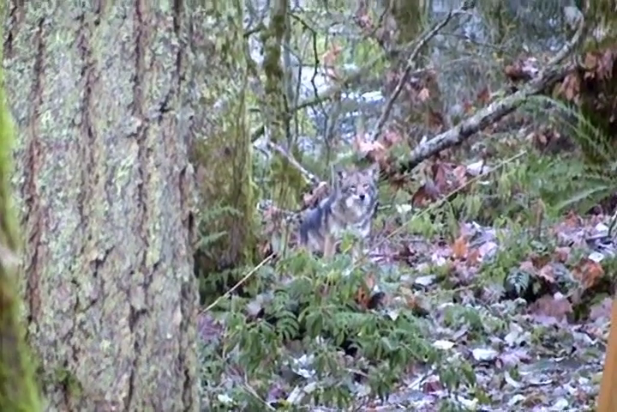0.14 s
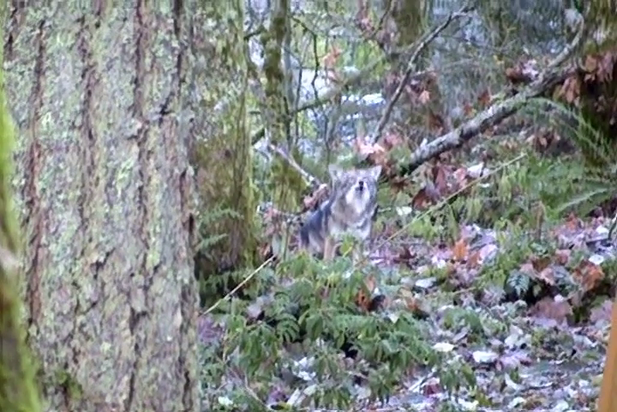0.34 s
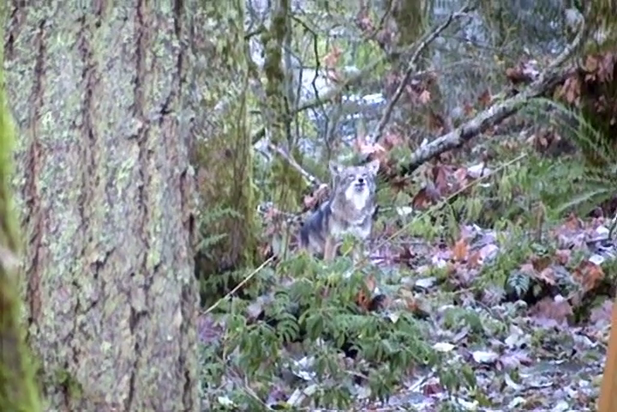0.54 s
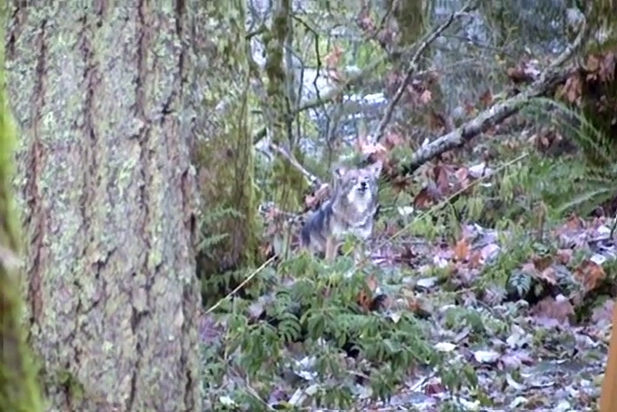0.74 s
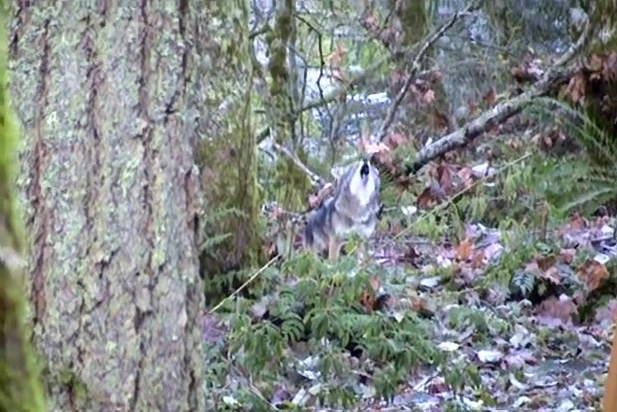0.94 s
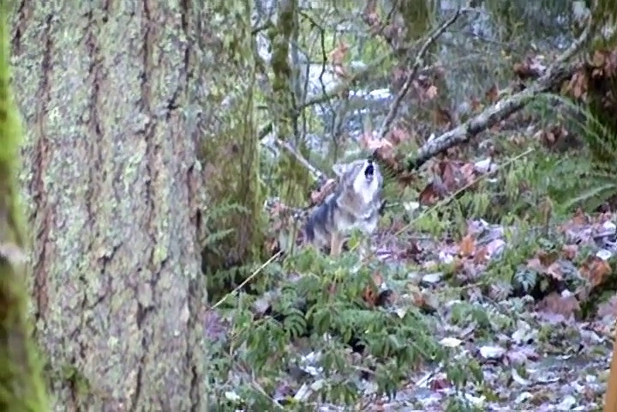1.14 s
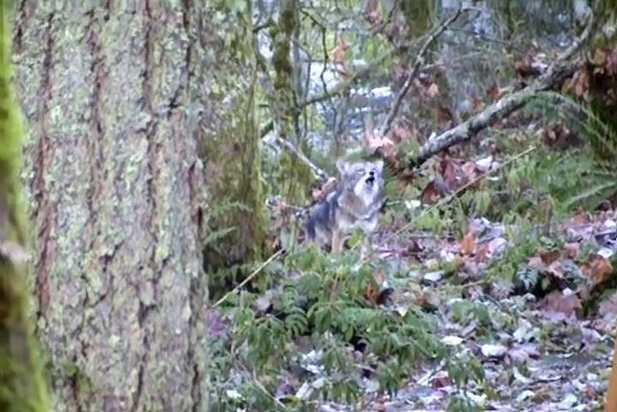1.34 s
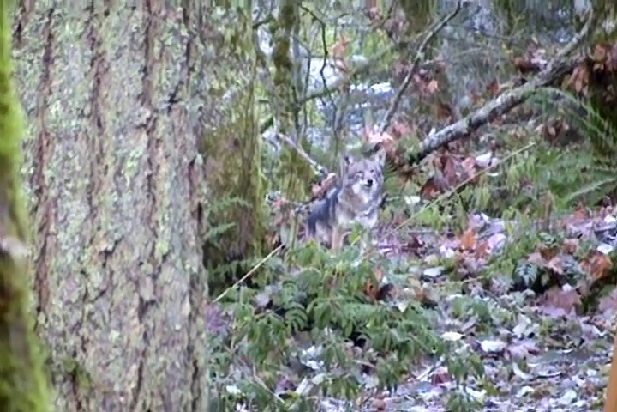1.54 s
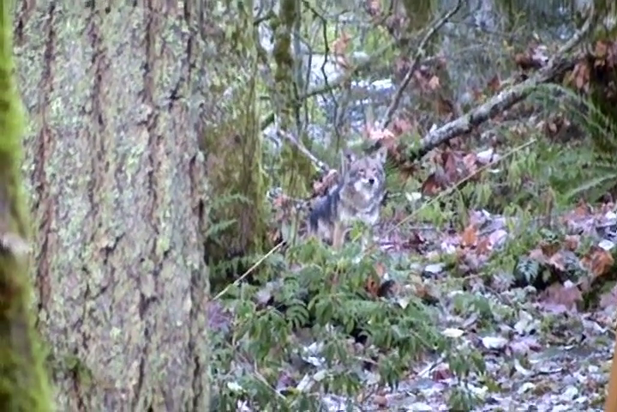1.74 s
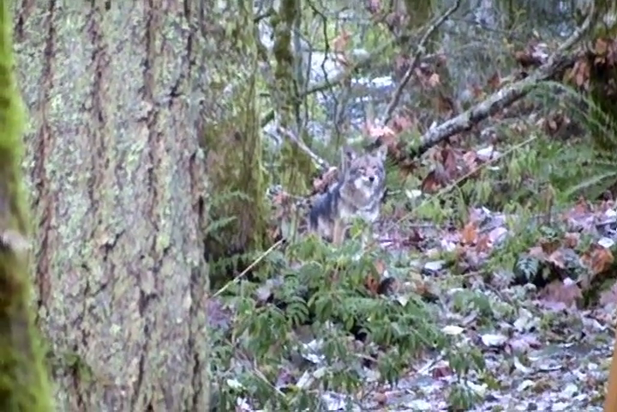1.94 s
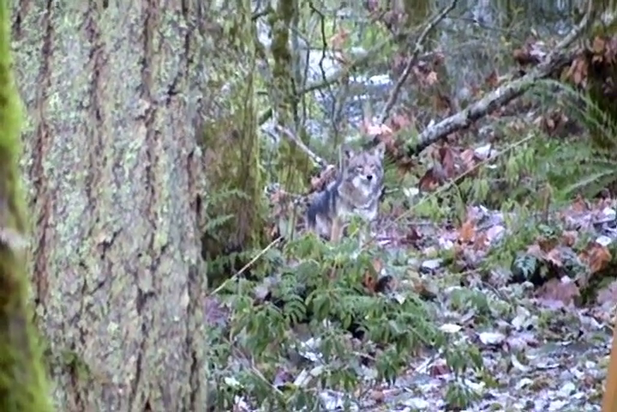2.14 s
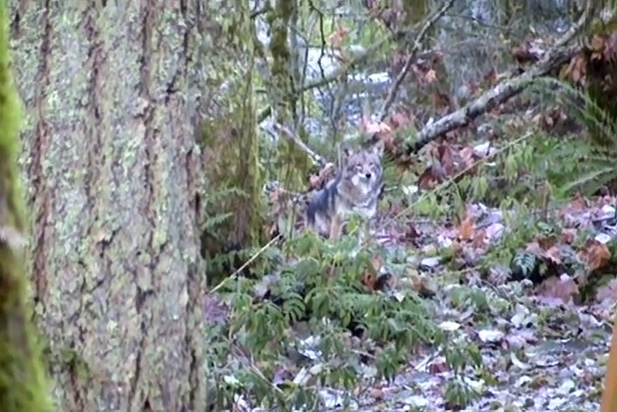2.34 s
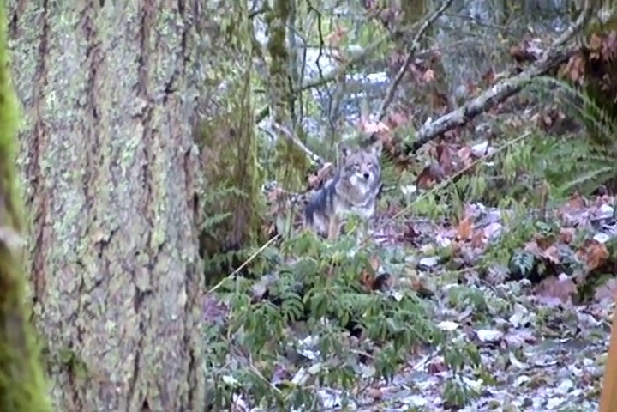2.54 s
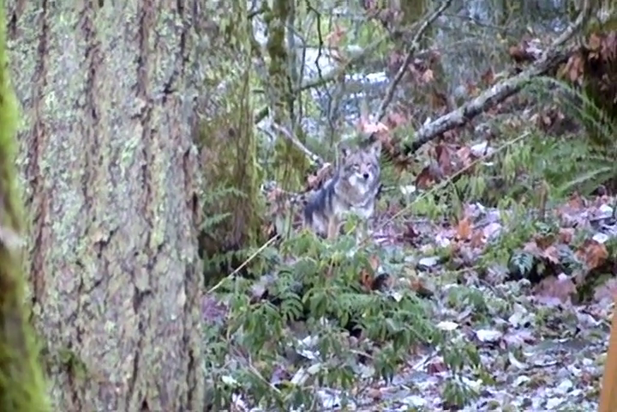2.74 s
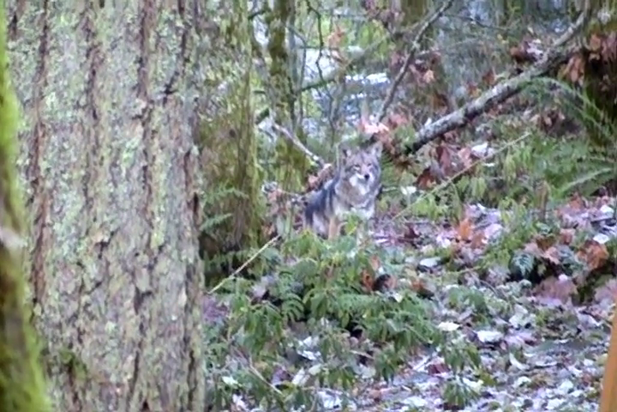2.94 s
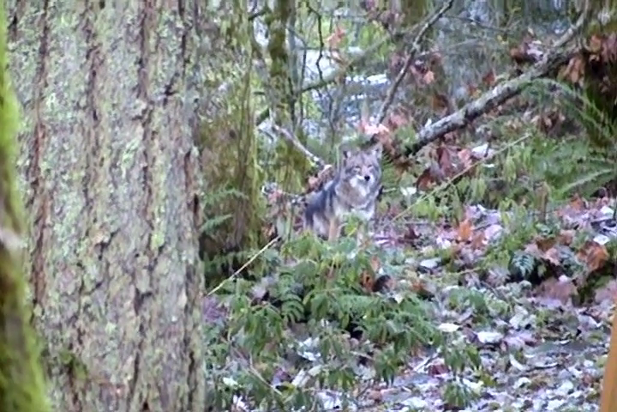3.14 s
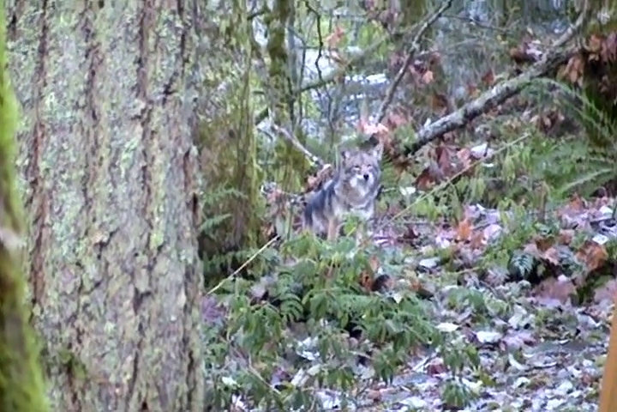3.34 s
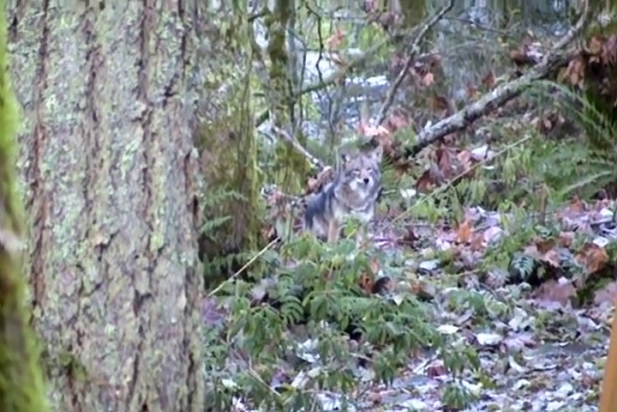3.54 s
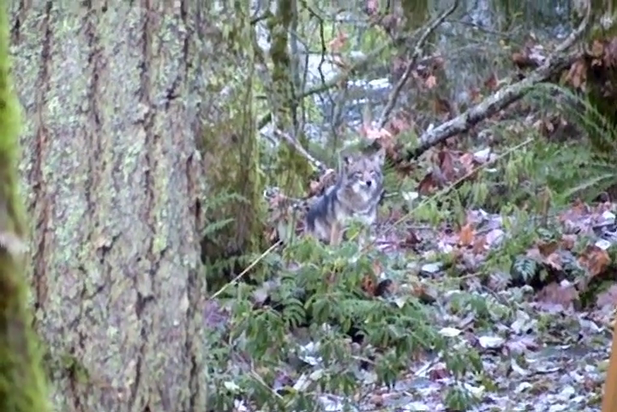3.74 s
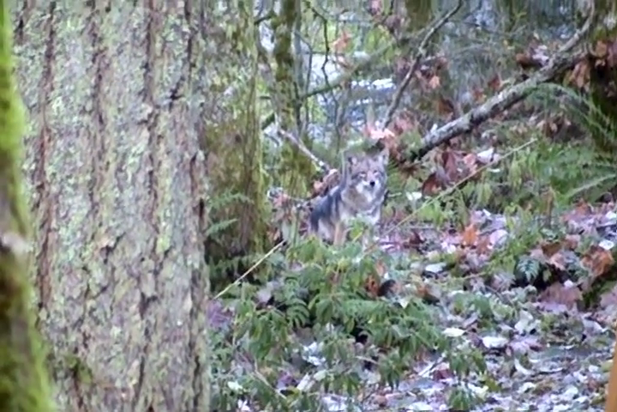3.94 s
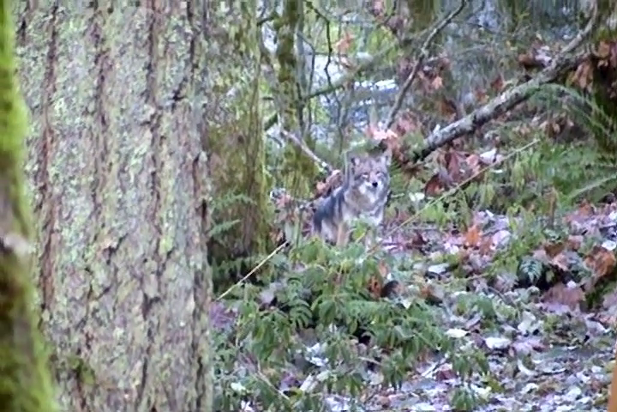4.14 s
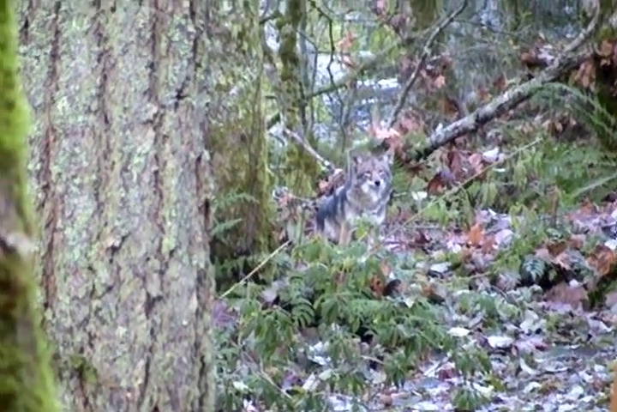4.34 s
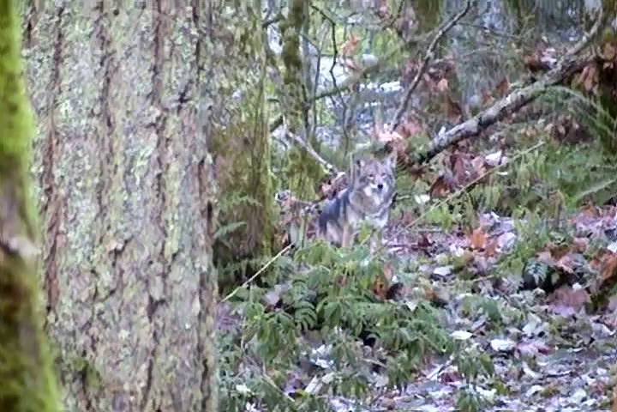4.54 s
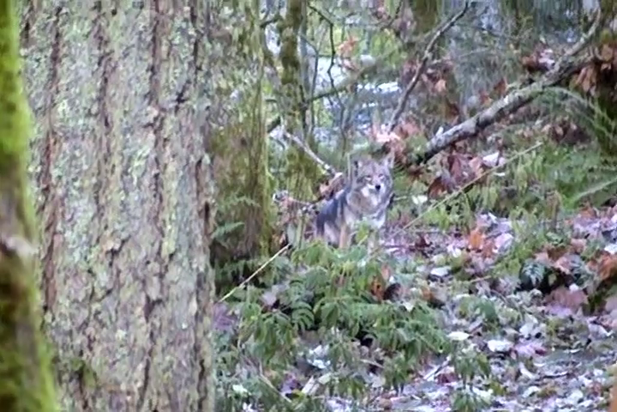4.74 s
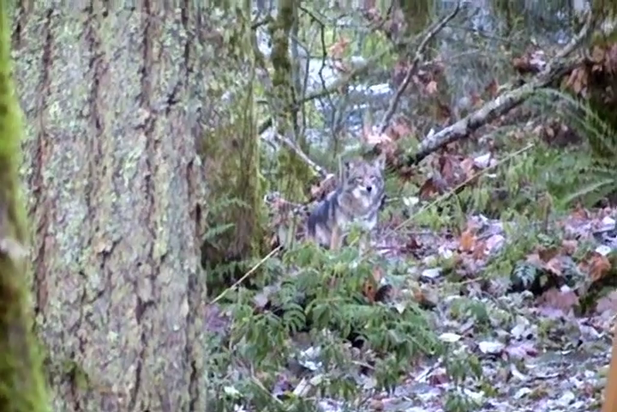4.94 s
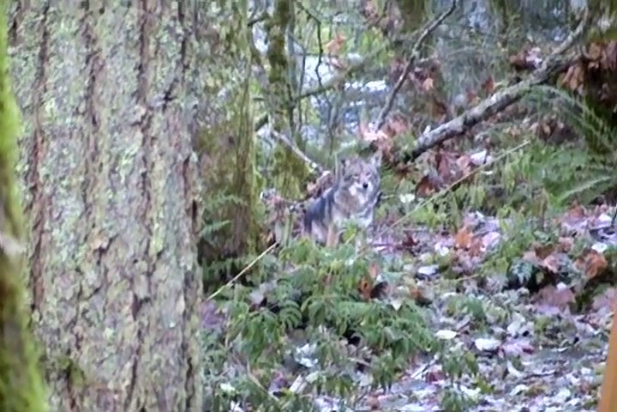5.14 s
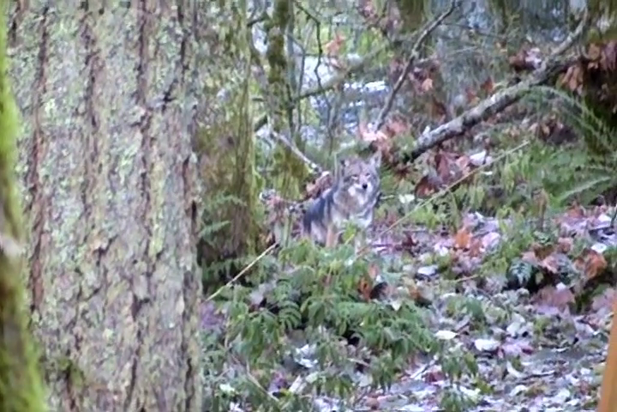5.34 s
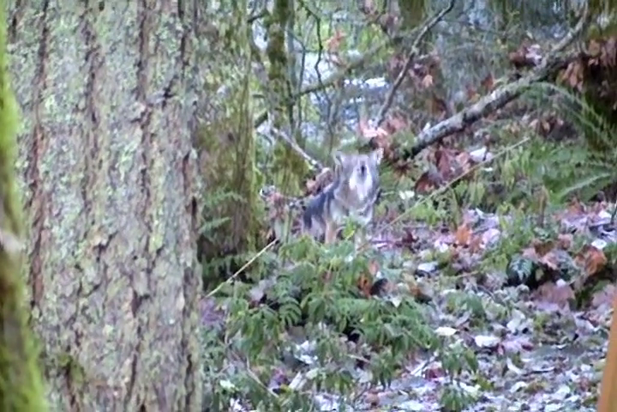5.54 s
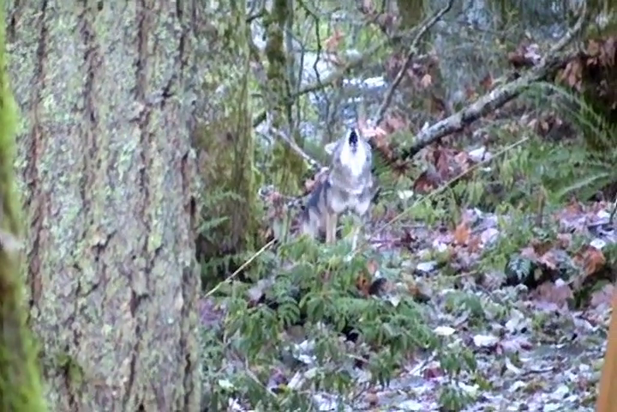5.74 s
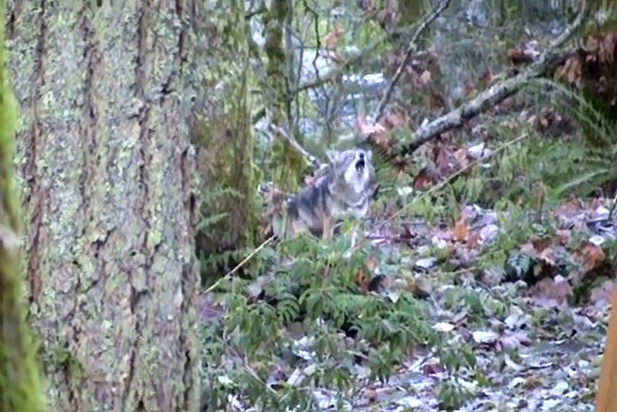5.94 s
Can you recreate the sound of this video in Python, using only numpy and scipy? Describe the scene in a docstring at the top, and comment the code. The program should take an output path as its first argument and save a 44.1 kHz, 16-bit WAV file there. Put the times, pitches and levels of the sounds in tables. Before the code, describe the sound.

A wild coyote barks and yelps loudly in an echoing forest, a hoarse animal barks faintly far off, then the coyote howls up again.

```python
"""Coyote calling in a forest

A coyote barks once, yelps, huffs and yelps again; a far animal answers with hoarse barks.
Vocal folds sound a stack of partials through the throat, rough or clear, at times two notes at once.
Breath wheezes and rasps; a faint whistle sounds far off. Trunks scatter all these into a decaying noise tail.
Filtered noise makes the distant traffic, a heavy vehicle's rumble, a twig snap and a small camera's hiss."""
import sys
import numpy as np
from scipy import signal
from scipy.fft import rfft, irfft, next_fast_len
from scipy.io import wavfile
from scipy.ndimage import uniform_filter1d

SR = 44100
rng = np.random.default_rng(int(sys.argv[2]) if len(sys.argv) > 2 else 0)


def log_audio(samples):
    """Write samples as a 16-bit WAV file to the path given in sys.argv[1]."""
    # one column per channel
    frames = np.atleast_2d(samples).T
    # limit to full scale, then quantise
    limited = np.clip(frames, -1, 1)
    pcm = np.round(limited * 32767).astype(np.int16)
    wavfile.write(sys.argv[1], SR, pcm)


def elevation(decibels):
    """Turn decibel levels (scalar or array-like) into linear amplitude ratios."""
    levels = np.asarray(decibels, float)
    return 10 ** (levels / 20)


N = 268128

# throat and mouth response: f/Hz, gain/dB
THROAT = [(300, -38), (480, -2), (950, 1.5), (1250, 7), (1600, 2.5), (1900, 2.5), (2500, -13),
          (3200, -23.5), (3650, -28), (4300, -32), (5200, -32), (6100, -22.5), (6700, -32), (7300, -24.5),
          (8600, -49.5), (9500, -69.5), (11500, -51.5), (15000, -103.5)]
FULL_EFFORT_DB = -15  # call level that counts as full effort
# swell of wheezes and whistle: share of length, gain/dB
ARCH = [(0, -10), (.25, 0), (.8, -3), (1, -14)]


def colour(x, points):
    """Filter by (f/Hz, gain/dB) points joined on a log-frequency axis."""
    size = next_fast_len(len(x))
    f_hz, gain_db = np.transpose(points)
    bins_hz = np.arange(size // 2 + 1) * SR / size
    gain = elevation(np.interp(np.log(bins_hz + 1), np.log(f_hz), gain_db))
    return irfft(rfft(x, size) * gain, size)[:len(x)]


def level(x, db):
    """Scale to an rms level."""
    return x * elevation(db) / np.sqrt(np.mean(x ** 2))


def wobble(size, hz):
    """Low-passed noise of rms 1: smooth random drift up to about hz."""
    lowpass = signal.butter(2, hz, fs=SR, output="sos")
    return level(signal.sosfilt(lowpass, rng.standard_normal(size)), 0)


def stereo(mid, side):
    """Left is mid + side, right is mid - side."""
    return mid + side * np.array([[1], [-1]])


def voice(throat, hz, rough, tilt_db, lowest_db=0, *, jitter, breath_db, second):
    """Partials of unsteady folds plus turbulent air, both shaped by the throat; rms near 1 throughout."""
    second_hz, partial_drift_db = 485, 2.5
    rough, size = np.clip(rough, 0, 1), len(hz)
    # rough folds slip in period and in strength from cycle to cycle
    unsteady_hz = hz * (1 + jitter * rough ** 1.5 * wobble(size, 160))
    phase = 2 * np.pi * np.cumsum(unsteady_hz) / SR
    shimmer = 1 + 1.124 * rough * wobble(size, 110)

    f_hz, throat_db = np.transpose(throat)
    tone, power = 0, 0
    for k in range(1, 26):
        gain_db = np.interp(np.log(k * hz), np.log(f_hz), throat_db)
        gain_db = gain_db + tilt_db * np.log2(k * hz / 1500)
        # upper partials swell and sag, each on its own
        gain_db = gain_db + (lowest_db if k == 1 else partial_drift_db * wobble(size, 15.6))
        gain = elevation(gain_db) * (k * hz < f_hz[-1])
        tone = tone + gain * np.sin(k * phase + k * k)
        power = power + gain ** 2 / 2

    # a second vibration puts faint side tones beside every partial
    beat = 1 + 2 * second * np.cos(2 * np.pi * second_hz * np.arange(size) / SR)
    air = level(colour(rng.standard_normal(size), throat), breath_db)
    air = air * (1 + .5 * np.cos(phase))
    # a wider mouth lets out more of the high hiss too
    dull = colour(air, [(2000, 0), (4000, -40)])
    air = dull + elevation(6 + 2 * tilt_db) * (air - dull)
    mix = tone * shimmer * beat / np.sqrt(power) + rough * air
    return mix / np.sqrt(1 + (rough * elevation(breath_db)) ** 2)


def played(notes, throat, **folds):
    """Sound every note over its own span, with 2 ms added at each end; notes may overlap.

    Note columns: t/s, pitch/Hz, level/dB, roughness, tilt/(dB/oct)[, lowest partial/dB]."""
    extra = 90  # samples
    out = np.zeros(N + SR)
    for note in notes:
        t_s, *columns = np.transpose(note)
        at = np.arange(int(t_s[0] * SR) - extra, int(t_s[-1] * SR) + extra)
        hz, db, *timbre = (np.interp(at / SR, t_s, column) for column in columns)
        fade = signal.windows.tukey(len(at), 4 * extra / len(at))
        out[at] += fade * elevation(db) * voice(throat, hz, *timbre, **folds)
    return out[:N]


def swells(events, rough, tilt_db, shape):
    """Notes gliding from first to last pitch under one shape of (share of length, gain/dB)."""
    return [[(s + p * length_s, hz + p * (end_hz - hz), db + swell_db, rough, tilt_db)
             for p, swell_db in shape]
            for s, length_s, hz, end_hz, db in events]


def hoarse(s, length_s, climb_s, hz, top_hz, db):
    """Level, pitch and roughness climb, then level drops; the mouth opens with the effort."""
    onset_db, onset_share = -42.5, .18  # start below full; closing time constant as share of climb
    release_s, release_db = .045, -17
    start_rough, top_rough = .33, .44
    base_tilt_db, shut_tilt_db = 2, -14.5  # dB/oct; shut is the dullest
    tilt_per_db, tilt_per_call_db = 2, 3  # lost per dB under the call's top; per dB of softer call
    sag_tilt_db_per_s, tilt_per_top_oct = 12, 4.5  # lost as the call is held; per octave of top pitch

    t = np.arange(0, length_s + release_s, .002)
    climbed = np.clip(t / climb_s, 0, 1)
    under_db = onset_db * np.exp(-t / (onset_share * climb_s))
    off_db = release_db * np.clip(t - length_s, 0, 1) / release_s
    rough = start_rough + (top_rough - start_rough) * climbed
    pitch_hz = hz + (top_hz - hz) * climbed ** 2 * (3 - 2 * climbed)

    tilt_db = base_tilt_db + tilt_per_db * under_db + off_db / 2
    tilt_db = tilt_db + tilt_per_call_db * (db - FULL_EFFORT_DB)
    tilt_db = tilt_db - sag_tilt_db_per_s * np.clip(t - climb_s, 0, 1)
    tilt_db = tilt_db - tilt_per_top_oct * np.log2(top_hz / 740)
    tilt_db = np.maximum(tilt_db, shut_tilt_db)
    return np.transpose([s + t, pitch_hz, db + under_db + off_db, rough, tilt_db])


def hoarse_calls():
    """Rough folds behind a wide-open mouth that rings in one broad band."""
    # calls, at times two at once: t/s, length before release/s, climb/s, first pitch/Hz, top pitch/Hz,
    # level before mouth filter/dB
    calls = [(0.39, 0.13, .1, 477, 589, -19), (0.914, 0.084, 0.14, 468.6, 695, -18),
             (3.479, 0.062, 0.021, 447.6, 481.4, -35), (5.704, 0.29, .185, 465.3, 724.4, -15),
             (5.756, 0.21, 0.079, 929.6, 1006, -17.5)]
    # open-mouth response: f/Hz, gain/dB
    open_mouth = [(650, -3), (1100, -1), (1500, 6), (2050, -2), (3200, -3), (6000, -2)]
    notes = [hoarse(*row) for row in calls]
    return colour(played(notes, THROAT, jitter=.13, breath_db=-2.5, second=.05), open_mouth)


def yelp(curve):
    """Clear while the pitch holds, rough while it slides or the effort sags; higher notes are brighter."""
    clear_rough, rough_per_oct_s, rough_per_db = .03, .065, .008
    step_s, settle_s = .002, .008
    base_tilt_db, tilt_per_oct = .1, 3.1  # dB/oct; added per octave of pitch
    weak_db, weak_tilt_per_db = -28, .8  # tilt lost per dB under weak_db
    s, hz, db, lowest_db = np.transpose(curve)
    t = np.arange(s[0], s[-1], step_s)
    hz, db = np.interp(t, s, hz), np.interp(t, s, db)
    slide_oct_s = uniform_filter1d(np.abs(np.gradient(np.log2(hz), t)), size=int(settle_s / step_s))
    rough = clear_rough + rough_per_oct_s * slide_oct_s + rough_per_db * (FULL_EFFORT_DB - db)
    rough = np.clip(rough, 0, .5)
    tilt_db = base_tilt_db + tilt_per_oct * np.log2(np.clip(hz / 930, 1, 1.35))
    tilt_db = tilt_db - weak_tilt_per_db * np.clip(weak_db - db, 0, None)
    return np.transpose([t, hz, db, rough, tilt_db, np.interp(t, s, lowest_db)])


def crack(s, length_s, hz, end_hz, db):
    """A falling note that swells and dies, brightest at its height."""
    rough, base_tilt_db, tilt_per_db = .55, 4, 2
    shape = [(0, -6), (.25, -3), (.5, -5), (1, -20)]  # share of length, gain/dB
    return [(s + p * length_s, hz + p * (end_hz - hz), db + swell_db,
             rough, base_tilt_db + tilt_per_db * swell_db) for p, swell_db in shape]


def yelps_and_cracks():
    """Clear yelps, and notes where the voice cracks and drops."""
    # one table per yelp: t/s, pitch/Hz, level/dB, extra gain of lowest partial/dB
    curves = [
        [(.965, 650, -35.5, 0), (.99, 755, -25, 0), (1.02, 850, -21, -2), (1.042, 898, -15.5, -2),
         (1.066, 912, -14, -5), (1.085, 913, -18.5, -5), (1.144, 949, -16, -4), (1.16, 942, -14.5, -6),
         (1.172, 932, -23, -3), (1.184, 930, -16.5, -6), (1.22, 945, -18, -4)],
        [(1.216, 1480, -22, 8), (1.231, 1240, -19, -3), (1.25, 1219, -21, -8), (1.264, 1218, -15.5, -1),
         (1.284, 1220, -11, 4), (1.335, 1227, -12.5, 2), (1.375, 1218, -11, 2), (1.415, 1200, -15, -1),
         (1.441, 1218, -24, -10), (1.456, 1224, -14, 2), (1.49, 1219, -11, 6)],
        [(5.99, 960, -18, 2), (6.018, 925, -16, -3), (6.048, 939, -16.5, -8), (6.062, 960, -14, -2),
         (6.08, 975, -14, 8)],
    ]
    # cracks: t/s, length/s, first pitch/Hz, last pitch/Hz, level before swell/dB
    drops = [(0.456, .09, 795.7, 629, -21.5), (1.487, .065, 800, 429, -16)]
    notes = [crack(*row) for row in drops] + [yelp(curve) for curve in curves]
    return played(notes, THROAT, jitter=.13, breath_db=-3, second=.05)


def wheeze():
    """Breath whistling in the nose as a call starts or dies: gliding tones."""
    # t/s, length/s, first pitch/Hz, last pitch/Hz, level before swell/dB
    breaths = [(.4, 0.15, 3600, 3800, -57), (.915, 0.1, 3450, 3800, -63), (3.48, 0.14, 3700, 3310, -62),
               (5.715, 0.2, 3560, 4050, -56)]
    return played(swells(breaths, .62, -20, ARCH), THROAT, jitter=.06, breath_db=-40, second=0)


def rasp():
    """Air rasping past the teeth: flickering hiss that swells to a peak and dies away."""
    # teeth response: f/Hz, gain/dB
    teeth = [(4200, -31), (4800, -14.5), (5300, -14.5), (6100, 4), (6700, -5), (7300, -9), (8400, -15.5),
             (9500, -48)]
    # t/s, length/s, level before swell/dB
    bursts = [(0.415, 0.135, -45), (0.93, 0.17, -46), (1.47, 0.085, -50), (3.485, 0.1, -66),
              (5.745, 0.13, -43)]
    shape = [(0, -28), (.33, -4), (.52, 5), (.72, 0), (.8, -12), (1, -30)]  # share of length, gain/dB
    share, swell_db = np.transpose(shape)
    t, gain = np.arange(N) / SR, np.zeros(N)
    for s, length_s, db in bursts:
        gain += elevation(db + np.interp(t, s + share * length_s, swell_db, left=-99, right=-99))
    flicker = elevation(1.5 * wobble(N, 90))
    return gain * level(colour(rng.standard_normal(N), teeth), 0) * flicker


def whistle():
    """A faint thin gliding tone far off, perhaps a bird."""
    # t/s, length/s, first pitch/Hz, last pitch/Hz, level before swell/dB
    tones = [(4.12, 0.363, 2870, 2835, -65.5)]
    return played(swells(tones, .3, -20, ARCH), THROAT, jitter=.06, breath_db=-40, second=0)


def forest(x, rise_s, stretch, side_db):
    """Trunks send back a dense tail that swells, then fades at a rate set per band; nearly mono."""
    # scatter decay: f/Hz, t60 before stretch/s
    decay = [(300, 2.5), (700, 2.0), (1300, 1.7), (2500, 1.65), (3600, 0.9), (7000, 0.7)]
    t = np.arange(2 * SR) / SR
    f_hz, t60_s = np.transpose(decay)
    tails = np.zeros((2, len(t)))
    for hz in 150 * 2 ** np.arange(0, 6.6, .5):
        band = [(hz / np.sqrt(2), -40), (hz / 2 ** .25, -3), (hz, 0),
                (hz * 2 ** .25, -3), (hz * np.sqrt(2), -40)]
        band_t60_s = stretch * np.interp(np.log(hz), np.log(f_hz), t60_s)
        fade = elevation(-60 * t / band_t60_s)
        tails += [colour(noise, band) * fade for noise in rng.standard_normal((2, len(t)))]
    tails *= 1 - np.exp(-t / rise_s)
    mid, side = (signal.fftconvolve(x, tail / np.sqrt(np.sum(tail ** 2)))[:N] for tail in tails)
    return stereo(mid, elevation(side_db) * side)


def coyote():
    """Near voice, breath and the whistle, with scatter; air and leaves dull the scatter."""
    # scatter response: f/Hz, gain/dB
    scatter = [(500, -12), (1300, -11), (2600, -4), (3600, -11), (5000, -18), (8000, -22)]
    # a small mouth radiates no bass
    highpass = signal.butter(4, 330, "high", fs=SR, output="sos")
    direct = signal.sosfilt(highpass, yelps_and_cracks() + hoarse_calls() + wheeze() + rasp())
    direct = direct + whistle()
    return direct + forest(colour(direct, scatter), rise_s=.0018, stretch=.72, side_db=-17)


def far_barks():
    """A hoarse lower voice far behind the trees, direct and scattered."""
    # barks: t/s, length/s, first pitch/Hz, last pitch/Hz, level before swell and mix/dB
    barks = [(1.689, 0.29, 385.8, 418.9, -32.5), (2.002, 0.29, 394, 345.3, -32.5),
             (2.4, 0.19, 369.4, 365, -36.5), (2.66, 0.21, 387.7, 372.2, -34.5),
             (2.997, 0.18, 411.9, 417.7, -34), (3.239, 0.109, 429, 417, -45),
             (3.689, 0.11, 449, 433.5, -29), (3.898, 0.15, 439.8, 399.6, -29.5),
             (4.129, .15, 414.5, 402.3, -35.5), (4.32, .15, 411, 395.8, -35),
             (4.541, 0.16, 412.9, 362.2, -34.5), (4.779, 0.13, 386, 369, -44.5)]
    # throat dulled by the way through the trees: f/Hz, gain/dB
    far_throat = [(250, -10), (420, 2.5), (800, 8.5), (1080, -8.5), (1350, 4), (1750, -12.5), (2200, -10.5),
                  (2800, -70), (4000, -65)]
    shape = [(0, -7), (.22, -1), (.75, -11), (1, -3)]  # share of length, gain/dB
    direct = played(swells(barks, .62, 0, shape), far_throat, jitter=.12, breath_db=-5, second=0)
    return elevation(-4) * direct + elevation(-3) * forest(direct, rise_s=.012, stretch=.47, side_db=-19)


def traffic():
    """Distant traffic: coloured noise whose level drifts slightly."""
    # relative spectrum: f/Hz, density/dB per Hz
    spectrum = [(25, -24), (70, -20.5), (130, -11.5), (220, -11), (500, -7.5), (950, -11.5), (1600, -19),
                (3000, -33), (6000, -42), (10000, -68)]
    mid, side = (level(colour(noise, spectrum), -44) * elevation(.18 * wobble(N, 4.2))
                 for noise in rng.standard_normal((2, N)))
    return stereo(mid, elevation(-21) * side)


def rumble():
    """A heavy vehicle far away: low noise under a slow level curve."""
    # t/s, mid level/dB
    swell = [(0, -58), (2.598, -57), (3.2, -50), (4.6, -46), (6.08, -47.5)]
    hum = [(22, -22), (60, -7), (90, -9), (135, 0), (230, -14), (900, -70)]  # f/Hz, gain/dB
    t_s, db = np.transpose(swell)
    gain = elevation(np.interp(np.arange(N) / SR, t_s, db))
    mid, side = (level(colour(noise, hum), 0) * gain for noise in rng.standard_normal((2, N)))
    return stereo(mid, elevation(-21) * side)


def twig():
    """A twig snaps: a coloured noise burst with a 0.7 ms decay constant."""
    # t/s, gain on the burst/dB
    snaps = [(3.9504, -37)]
    out, size = np.zeros(N), 200
    for s, db in snaps:
        burst = rng.standard_normal(size) * np.exp(-np.arange(size) / SR / .0007)
        start = int(s * SR)
        out[start:start + size] += elevation(db) * colour(burst, [(1500, -4), (3500, 9), (12000, -2)])
    return out


def scene():
    """Both animals and the background."""
    return coyote() + far_barks() + traffic() + rumble() + twig()


def top_cut(x):
    """Nothing passes above the cut-off."""
    return signal.sosfilt(signal.butter(12, 15760, fs=SR, output="sos"), x)


def record(dry):
    """Two close ports, the left warmer; preamplifier hiss, partly shared; peaks clip at full scale."""
    lean = [(200, .7), (1500, .6), (4000, -.7)]  # f/Hz, left gain/dB; right is the inverse
    ports = np.array([colour(dry[0], lean), colour(dry[1], [(f, -db) for f, db in lean])])
    shared, opposed = rng.standard_normal((2, N))
    hiss = elevation(-64.5) * stereo(shared, elevation(-6) * opposed)
    mix = np.clip(ports + hiss, -1, 1)
    return top_cut(mix)


dry = scene()
out = record(dry)
log_audio(out)
```